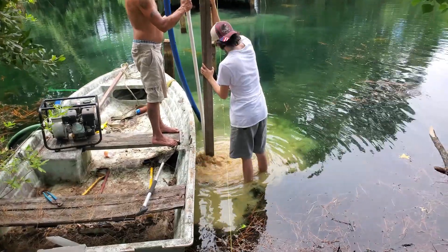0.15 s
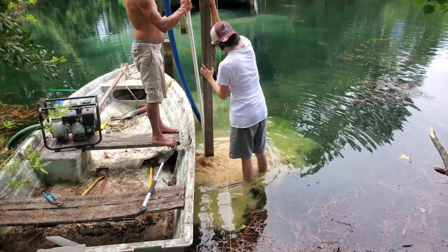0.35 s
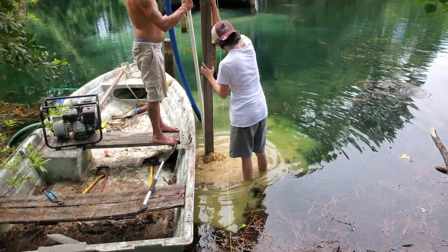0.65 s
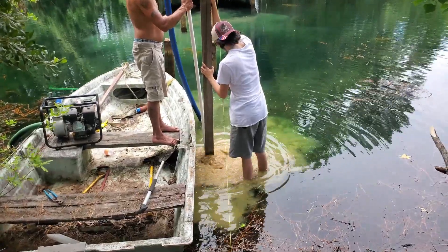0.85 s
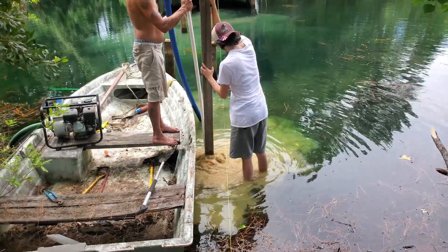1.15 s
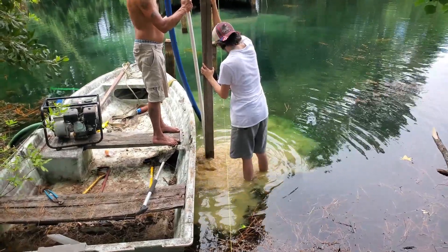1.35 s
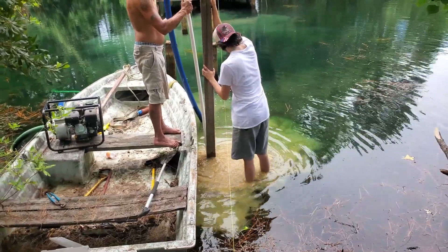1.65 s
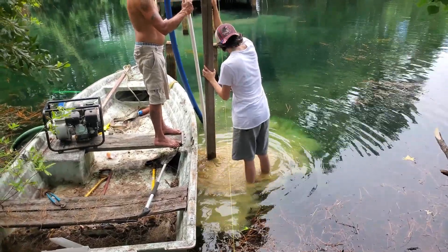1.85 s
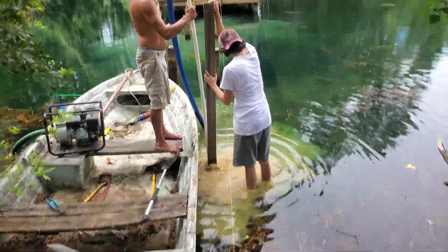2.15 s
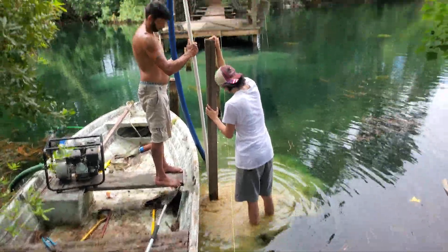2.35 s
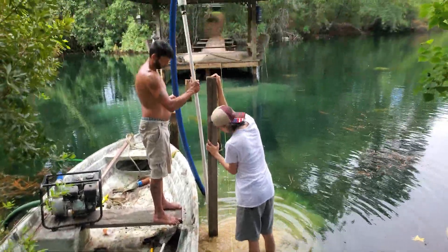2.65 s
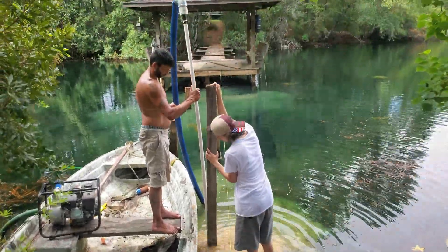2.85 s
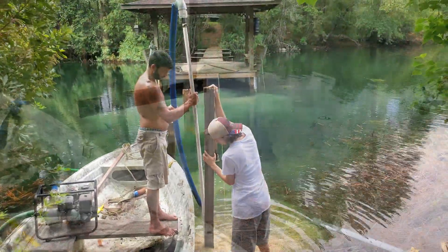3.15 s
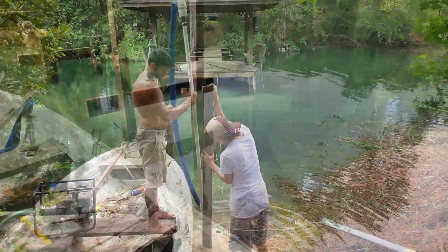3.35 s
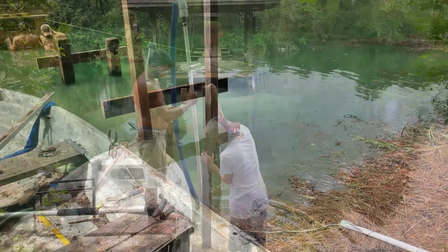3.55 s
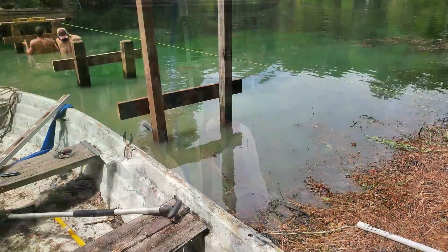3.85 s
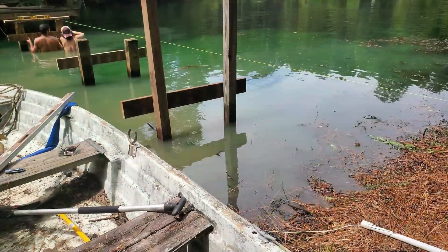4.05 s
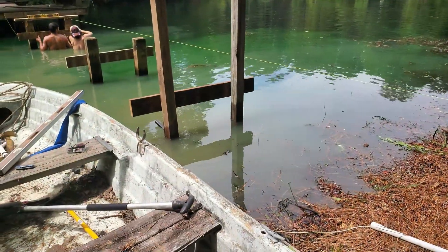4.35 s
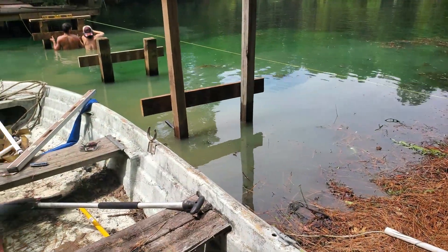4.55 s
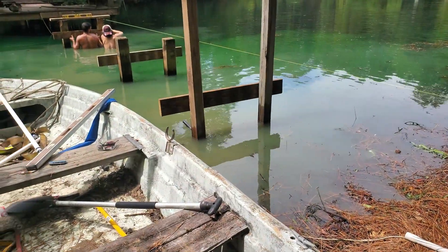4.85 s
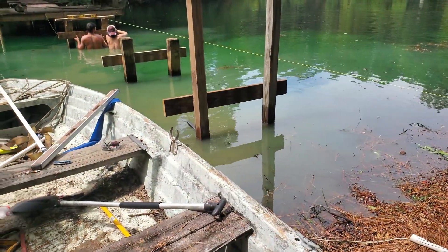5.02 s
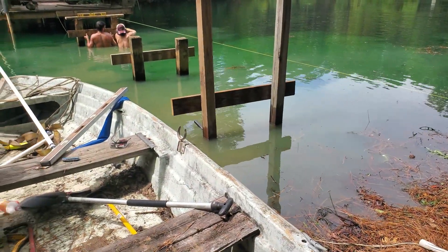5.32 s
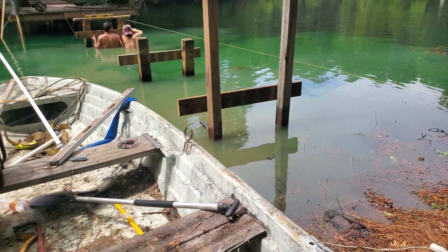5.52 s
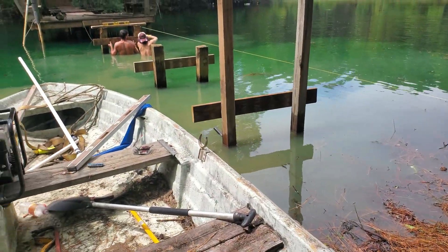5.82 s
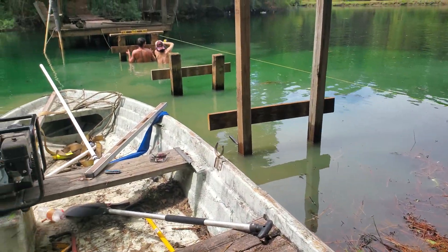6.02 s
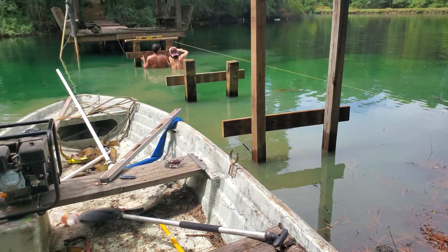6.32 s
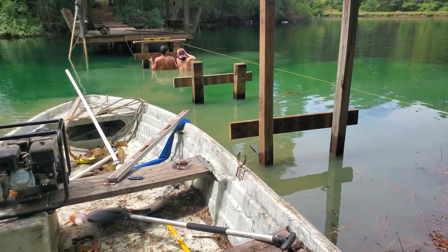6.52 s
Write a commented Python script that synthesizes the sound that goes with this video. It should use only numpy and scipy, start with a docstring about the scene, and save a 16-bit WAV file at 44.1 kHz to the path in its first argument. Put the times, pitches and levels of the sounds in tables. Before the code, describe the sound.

A small petrol pump runs steadily close by in a boat at a lake edge, with fast exhaust thuds and a metallic rattle. It fades away into a faint distant engine drone, soft outdoor hiss and thin insect sound. A small wave slops at the bank. Then something ribbed is dragged in two dry, zipping scrapes, with a cluster of hollow knocks on the hull and a few lighter ones. Everything sits to the left of the microphone.

```python
"""A one-cylinder four-stroke petrol pump thuds and clatters in a small boat at a lake edge.
Each engine cycle puffs through the exhaust, rings the metal casing and shakes loose parts.
As the pump fades away, a distant engine drone, soft outdoor hiss and insects fade in.
Small waves slop at the bank. Close by on the left, something ribbed is dragged in two main
dry scrapes, with a few knocks against the hull."""
import sys
import numpy as np
from scipy import signal
from scipy.fft import rfft, irfft, next_fast_len
from scipy.io import wavfile

SR = 44100
rng = np.random.default_rng(int(sys.argv[2]) if len(sys.argv) > 2 else 0)


def waveform_to_disk(signal):
    """Save audio, clipped to [-1, 1], as 16-bit WAV at the path in sys.argv[1]."""
    frames = np.transpose(np.atleast_2d(signal))
    scaled = np.clip(frames, -1, 1) * 32767
    samples = np.round(scaled).astype(np.int16)
    wavfile.write(sys.argv[1], SR, samples)


N = 294588
T = np.arange(N) / SR
FADE_START_S, FADE_END_S = 2.635, 4.02  # the pump fades out while the lakeside fades in


def from_db(db):
    """Turn decibels into a number to multiply by."""
    return 10 ** (np.asarray(db) / 20)


def rms_one(x):
    """Scale a sound to an average power of 1."""
    return x / np.sqrt(np.mean(x ** 2) + 1e-20)


def at_hz(points, hz):
    """Read a table between its rows, with pitch spaced in octaves."""
    f, value = np.transpose(points)
    return np.interp(np.log(hz + 1), np.log(f), value)


def filtered(x, response):
    """Change each frequency in x by what response(hz) gives."""
    size = next_fast_len(N + 4096)
    hz = np.arange(size // 2 + 1) * SR / size
    return irfft(rfft(x, size) * response(hz), size)[..., :N]


def drift(rate):
    """A random wander of size about 1 that takes a new direction rate times a second."""
    knots = rng.standard_normal(int(N / SR * rate) + 2)
    return rms_one(np.interp(T * rate, np.arange(len(knots)), knots))


# Each row: frequency in Hz, how alike left and right are (1 means the same).
LIKENESS = [(60, 0.7), (700, 0.72), (1500, 0.91), (3000, 0.28), (14000, 0.16)]
def noise(spectrum, loudness=1):
    """Stereo noise shaped by rows of Hz and dB; left and right differ most in the treble."""
    def colour(hz, sign):
        return from_db(at_hz(spectrum, hz)) * np.sqrt(1 + sign * at_hz(LIKENESS, hz))
    mid, side = rng.standard_normal((2, N)) * loudness
    mid = filtered(mid, lambda hz: colour(hz, 1))
    side = filtered(side, lambda hz: colour(hz, -1))
    return rms_one(np.array([mid + side, mid - side]))


def place(x, balance, lag_ms):
    """Put a sound on the left: that side hears it louder and earlier."""
    def ears(hz):
        ratio = from_db(at_hz(balance, hz))
        return np.array([ratio, np.exp(-2j * np.pi * hz * lag_ms * 1e-3)]) * 2 / (1 + ratio)
    return filtered(x, ears)


def clicks(times, db):
    """One sharp click at each time."""
    inside = (times >= 0) & (times < T[-1])
    return np.bincount((times[inside] * SR).astype(int), from_db(db)[inside], N) + 1e-18


def die_away(x, t60):
    """Give each click a tail that drops 60 dB in t60 seconds."""
    return signal.lfilter([1], [1, -np.exp(-np.log(1000) / (t60 * SR))], x)


def envelope(start, length, attack_s, release_s):
    """Rise 60 dB in the attack_s before start, hold, then fall 60 dB in release_s."""
    early, late = np.maximum(start - T, 0), np.maximum(T - start - length, 0)
    return np.exp(-np.log(1000) * np.minimum(early / attack_s + late / release_s, 2))


def strike(times, db, modes, scatter_db):
    """Every blow rings each of an object's notes (its modes) with a slightly random strength."""
    out = 0
    for k, (hz, mode_db, t60) in enumerate(modes):
        decay, step = np.exp(-np.log(1000) / (t60 * SR)), 2 * np.pi * hz / SR
        blows = clicks(times, db + mode_db + scatter_db * rng.standard_normal(times.shape))
        ring = signal.lfilter([0, np.sin(step)], [1, -2 * decay * np.cos(step), decay * decay], blows)
        out = out + (-1) ** k * ring
    return out


# The tones in the exhaust. Each row: multiple of the firing rate, relative level in dB.
EXHAUST_TONES = [(2, -2.5), (3, 1), (4, 3.5), (5, -3), (6, -1.5), (7, -11), (8, -12), (9, -9), (10, -14.5),
                 (12, -13), (13, -11.5), (14, -31), (15, -27), (16, -15), (17, -18.5), (18, -13),
                 (19, -13.5), (21, -35), (22, -10.5), (23, -12.5), (24, -27), (25, -11), (26, -22),
                 (27, -27.5), (28, -20)]
BOOM_HZ, BOOM_WIDTH_HZ = 97, 12  # the boat's boom under the pump
def exhaust(cycles, firing_hz, share, thud_db):
    """Tones at multiples of the firing rate line up into thuds, a little uneven in time and strength."""
    cycles = cycles + .0018 * drift(30)
    out = 0
    for k, db in EXHAUST_TONES:
        # the deep tones line up on the power stroke, the second blow
        bass = np.where(share == share[1], 1, 1 / (1 + (8 / k) ** 4))
        thuds = np.sum(bass * from_db(thud_db) * np.exp(-2j * np.pi * k * share))
        # the boat holds back tones near its boom, which fills the gaps between thuds
        held = 2 * np.arctan2(BOOM_WIDTH_HZ / 2, BOOM_HZ - k * firing_hz)
        out = out - from_db(db) * np.cos(2 * np.pi * k * cycles + np.angle(thuds) - held)
    return rms_one(out) * from_db(.5 * drift(30.05))


# We turn to another side of the engine. Each row: time in seconds, share of the turn made.
LISTENER_TURN = [(2.2, 0.22), (2.65, 1)]
# The casing's notes. Each row: pitch in Hz, relative level in dB, seconds to drop 60 dB,
# change in dB after the full turn.
CASING_NOTES = [(545, -1, 0.037, 4), (716, -8.5, 0.027, 12), (996, -1, 0.066, 1.5), (1333, 0, 0.12, -27),
                (1489, -7, 0.092, 2), (1970, 5.5, 0.036, -4.5), (2720, 7.5, 0.049, -6.5),
                (2940, 1, 0.048, 6.5), (3420, -6.5, 0.022, 8.5), (3930, 5.5, 0.026, -4.5),
                (4414, -10.5, 0.076, 4.5), (5400, -13, 0.048, -11), (8400, -8, 0.024, 1),
                (11000, -5.5, 0.017, 1)]
def casing(times, db):
    """Crankcase, cooling fins and frame ring at each blow."""
    turned = np.interp(times, *np.transpose(LISTENER_TURN))
    modes = [(hz, level + change * turned, t60) for hz, level, t60, change in CASING_NOTES]
    return rms_one(strike(times, db, modes, scatter_db=4.5))


# The rattle's tone colour. Each row: frequency in Hz, relative level in dB.
RATTLE_COLOUR = [(120, -32), (200, 0), (320, -16), (450, -5.5), (600, -3.5), (800, -7.5), (1300, -10),
                 (2350, -13), (2900, -5), (4200, -14), (7400, -23), (8900, -16), (11500, -22.5),
                 (16000, -25)]
def rattle(times, db):
    """Loose parts chatter all the time and flare up at each blow."""
    blows = clicks(times, db)
    return noise(RATTLE_COLOUR, die_away(blows, t60=.065) + die_away(blows, t60=.008) + .1)


def firing_tick(times, db):
    """The fuel fires with a short bright tick."""
    snap = die_away(clicks(times, db), t60=.009)
    return noise([(900, 10), (1600, 9.5), (4500, 6), (7400, -6.5), (11000, -1.5), (16000, -2)], snap)


def fan():
    """The fan makes a steady rush of air."""
    return noise([(80, -8), (200, -13.5), (450, -10), (700, -10.5), (1500, -5), (2400, -17.5),
                  (4300, -15), (7000, -45), (10000, -39), (15000, -54)])


# The pump's speed. Each row: time in seconds, firings per second.
PUMP_SPEED = [(0, 29.92), (.5, 29.8), (.85, 29.75), (1.85, 29.73), (2.3, 29.63), (2.6, 29.63), (2.9, 29.7)]
# The blows in one cycle: firing, power stroke, piston slap, exhaust valve and valve gear.
# Each row: place in the cycle from 0 to 1, then weights in dB for thud, rattle and metal ring.
CYCLE_BLOWS = [(.003, -1.5, -7.5, -4), (.068, 5.5, -3, 3), (.162, -1, -8.5, -5.5), (.367, 11, -14.5, -8),
               (.48, -22, -19, -15), (0.608, -9, -13, -19), (.723, -3.5, -4.5, -9), (.911, -7.5, -16, -11)]
# Each row: frequency in Hz, how many dB louder the pump is on the left.
PUMP_BALANCE = [(60, 2), (92, 7.5), (140, 5.5), (210, 8), (330, 5.5), (500, 8.0), (770, 6.5), (1170, 4),
                (1790, 2), (2740, 13.5), (4190, 13), (6410, 6), (9810, 4.5), (15000, 6.5)]
def pump():
    """Under a steady load, each cycle thuds, rings and rattles; then the whole sound fades away."""
    cycles = np.cumsum(np.interp(T, *np.transpose(PUMP_SPEED))) / SR + .06
    share, thud_db, rattle_db, ring_db = np.transpose(CYCLE_BLOWS)
    # one row of blows a cycle, each a little uneven in time and force
    times = np.interp(np.arange(int(cycles[-1]))[:, None] + share, cycles, T, left=-1)
    times = times + .00007 * rng.standard_normal(times.shape)
    force_db = rng.standard_normal((len(times), 1)) + rng.standard_normal(times.shape)
    clatter = (from_db(-1.5) * casing(times, ring_db + force_db)
               + from_db(-2.3) * rattle(times, rattle_db + force_db)
               + from_db(-9.5) * firing_tick(times[:, 0], force_db[:, 0])
               + from_db(-5) * fan())
    thud = exhaust(cycles, PUMP_SPEED[-1][1], share, thud_db)
    fade = np.interp(T, [FADE_START_S, FADE_END_S], [1, 0]) ** .87
    return fade * place(from_db(-37) * clatter + from_db(-31.5) * thud, PUMP_BALANCE, lag_ms=.17)


def far_machine(hz, tones, waver_db, wander):
    """A distant machine: each of its tones wavers on the way over the water."""
    cycles = np.cumsum(hz * (1 + wander * drift(4))) / SR
    return rms_one(sum(from_db(db + waver_db * drift(6.3)) * np.cos(2 * np.pi * k * cycles)
                       for k, db in tones))


# Two machines across the lake. Each row: multiple of the base rate, relative level in dB.
FAR_ENGINE_TONES = [(2, -4.5), (3, 2), (4, -9), (5, -5), (6, -11.5), (7, -28.5), (8, -23), (11, -11),
                    (21, -25), (24, -18.5)]
HUM_TONES = [(1, 4.5), (2, -17.5), (3, -17.5)]
FAR_FIRING_HZ, HUM_HZ = 26.95, 116.3
BEAT_CREST_S, BEAT_PERIOD_S, BEAT_DEPTH = 4.054, .98, .68
def drone():
    """A far engine drones while a second machine's hum swells and sinks in a slow beat."""
    engine = far_machine(FAR_FIRING_HZ, FAR_ENGINE_TONES, waver_db=1.5, wander=.003)
    hum = far_machine(HUM_HZ, HUM_TONES, waver_db=2, wander=.004)
    beat = np.abs(1 + BEAT_DEPTH * np.exp(2j * np.pi * (T - BEAT_CREST_S) / BEAT_PERIOD_S))
    return from_db(-47) * engine + from_db(-48) * beat * hum


# Low air, high air and insects in the trees. Each row: frequency in Hz, relative level in dB.
RUMBLE_COLOUR = [(20, -20), (45, 0.5), (70, 8), (130, 4), (200, -3.5), (300, -11.5), (420, -13.5),
                 (620, -15), (800, -18), (1300, -15), (2100, -21), (3000, -48)]
HISS_COLOUR = [(1200, -23), (2400, -0.5), (4400, 3), (5000, -3), (5700, -19.5), (7400, -19), (8800, -12),
               (10200, -4), (11000, -9), (12200, -20), (15500, -15)]
INSECT_COLOUR = [(9000, -44), (9750, -10), (9950, -20), (10250, 4), (10600, -13), (11200, -49)]
# Each row: frequency in Hz, how many dB louder the lakeside is on the left.
LAKE_BALANCE = [(60, 4), (500, 10), (1500, 11), (3000, 20.5), (4600, 19), (6000, 15), (10000, 2),
                (15000, 9)]
RUMBLE_RISE_DB_PER_S = .05
def lakeside():
    """The far drone, outdoor air and a thin hiss of insects come in as the pump fades."""
    machines = drone()
    rise_db = RUMBLE_RISE_DB_PER_S * np.maximum(T - FADE_END_S, 0)
    air = from_db(-46.5 + rise_db) * noise(RUMBLE_COLOUR) + from_db(-60.5) * noise(HISS_COLOUR)
    insects = from_db(-74) * noise(INSECT_COLOUR)
    fade = np.interp(T, [FADE_START_S, FADE_END_S], [0, 1])
    return fade * place(machines + air + insects, LAKE_BALANCE, lag_ms=.321)


# Waves at the bank. Each row: start in seconds, length in seconds, level in dB.
WAVES = [(3.964, .016, -52.5), (4.025, 0.029, -49.3), (4.113, .004, -59)]
def waves():
    """Small waves break into brief grainy splashes."""
    spray = noise([(600, -2.5), (1100, -.5), (1600, -2), (3000, -8.5), (4900, -8), (6500, -26),
                   (15000, -28)], from_db(2 * drift(250)))
    splashes = sum(from_db(db) * envelope(start, length, attack_s=.068, release_s=.096)
                   for start, length, db in WAVES)
    return place(splashes * spray, LAKE_BALANCE, lag_ms=.17)


# The gritty hiss of rubbing. Each row: frequency in Hz, relative level in dB.
GRIT_COLOUR = [(300, -16), (850, -17.5), (1050, -10), (1500, -5.5), (2400, 2), (3200, 3.5), (4300, 0.5),
               (5300, -9), (6800, -16), (9200, -14.5), (12000, -19.5), (15500, -24)]
# The zip of many tiny slips. Each row: multiple of the slip rate, relative level in dB.
ZIP_TONES = [(1, -14), (2, 0), (3, -2), (4, -9)]
# Each row: frequency in Hz, how many dB louder scrapes and knocks are on the left.
NEAR_BALANCE = [(500, 5), (1400, 7), (2400, 15), (3100, 11), (4000, 23), (6500, 5), (9000, 11), (12000, 0),
                (15000, 8)]
# Two loud strokes and two faint ones. Each row: start, length and rise time in seconds, level in dB,
# change in dB when fastest, slips per second when slow and when fastest,
# strength of the zip against the grit at the start and at the end.
SCRAPE_STROKES = [(4.454, 0.089, 0.027, -52.5, 0.5, 1100, 1150, 0.39, 0.56),
                  (4.804, 0.11, 0.074, -33, 3.5, 985, 1200, 0.58, 1.07),
                  (5.143, 0.078, 0.038, -30.5, -2.5, 745, 1070, 1.1, 0.12),
                  (5.247, 0.058, .05, -44.5, -.5, 760, 830, .1, .1)]
PUSH_PEAK, PUSH_WIDTH = .61, .21  # place and width of a stroke's fast part, as shares of its length
GRIP_S = .07  # the zip builds and dies this quickly, sounding only in firm contact
def scrapes():
    """A finely ribbed surface is rubbed: gritty hiss, and a zip whose pitch follows the speed."""
    grit = noise(GRIT_COLOUR, from_db(2 * drift(700)))
    unsteady = 1 + .016 * drift(900)
    tones = [(k, from_db(db + 3.5 * drift(120))) for k, db in ZIP_TONES]
    out = 0
    for start, length, rise_s, db, push_db, slow_hz, fast_hz, first_grip, last_grip in SCRAPE_STROKES:
        progress = np.clip((T - start) / length, 0, 1)
        push = np.exp(-.5 * ((progress - PUSH_PEAK) / PUSH_WIDTH) ** 2)
        slips = np.cumsum((slow_hz + (fast_hz - slow_hz) * push) * unsteady) / SR
        zip_tone = rms_one(sum(gain * np.sin(2 * np.pi * k * slips) for k, gain in tones))
        contact = envelope(start, length, GRIP_S, GRIP_S)
        grip = (first_grip + (last_grip - first_grip) * progress) * contact
        rub = from_db(push_db * push) * envelope(start, length, rise_s, release_s=.16)
        bank_echo = from_db(-19) * envelope(start, length, rise_s, release_s=1.33) * grit
        out = out + from_db(db) * (rub * (grit + grip * zip_tone) / np.hypot(1, grip) + bank_echo)
    return place(out, NEAR_BALANCE, lag_ms=.13)


# Each row: start in seconds, strength of the hull's ring in dB, strength of the click in dB.
HULL_KNOCKS = [(4.456, -72, -40), (5.072, -35, -46), (5.142, -30, -36), (5.206, -25, -24.5),
               (5.215, -26, -27), (5.23, -23, -26), (5.25, -38, -32), (5.272, -49, -42),
               (5.671, -35, -37.5), (5.696, -46, -54), (5.923, -50, -76.5)]
# The hull's notes. Each row: pitch in Hz, relative level in dB, seconds to drop 60 dB.
HULL_NOTES = [(90, -7.5, 0.096), (175, -3.5, 0.12), (225, -9, 0.05), (303, -6.5, 0.1), (403, -17, 0.12),
              (554, -9, 0.21), (602, -2, 0.082), (696, -7, 0.23), (896, -17, 0.13), (1055, -3, 0.088),
              (1310, -10, 0.13), (1500, 6, 0.044), (1840, -7, 0.056), (2400, -2, 0.054)]
def knocks():
    """Each knock gives a short gritty click, rings the hull and echoes faintly from the bank."""
    times, hull_db, click_db = np.transpose(HULL_KNOCKS)
    hull = from_db(-9) * strike(times, hull_db, HULL_NOTES, scatter_db=2.5)
    snap = die_away(clicks(times, click_db), t60=.013)
    grit = noise([(400, 9), (1500, -13), (4200, 4), (6500, -25), (9500, -4.5), (15000, -21)])
    fading = die_away(clicks(times, hull_db - 17), t60=.35)
    echo = noise([(120, -19), (300, -4), (600, 8.5), (1400, 1.5), (4000, -11), (8000, -44)])
    return place(hull + snap * grit + fading * echo, NEAR_BALANCE, lag_ms=.24)


def scene():
    """The pump gives way to the lakeside, then come waves, scrapes and knocks."""
    return pump() + lakeside() + waves() + scrapes() + knocks()


CUTOFF_HZ = 15950
def record(dry):
    """Each microphone opening dulls a narrow band of treble; the very top is cut off."""
    def openings(hz):
        notch_hz = np.array([[7350], [8050]])  # left, right
        dip_db = -7 * np.exp(-((hz - notch_hz) / 450) ** 2)
        return from_db(dip_db) * np.clip((CUTOFF_HZ - hz) / 200 + .5, 0, 1)
    return filtered(dry, openings)


dry = scene()
out = record(dry)
waveform_to_disk(out)
```